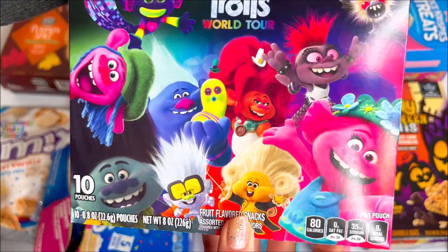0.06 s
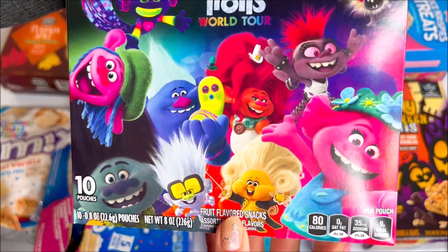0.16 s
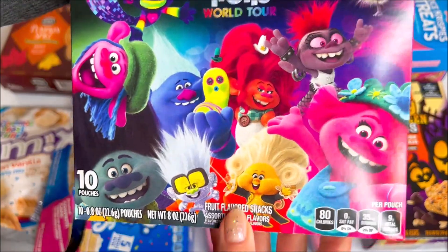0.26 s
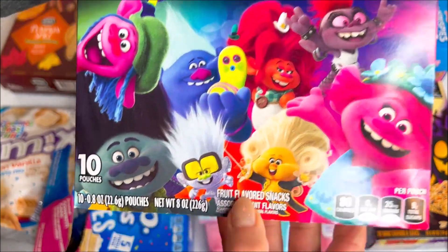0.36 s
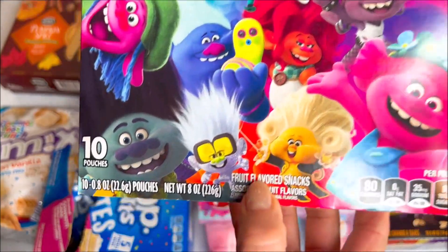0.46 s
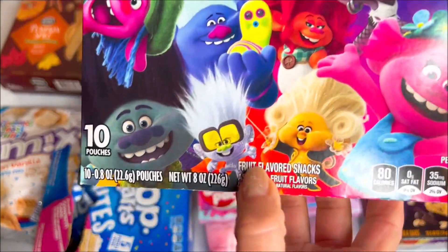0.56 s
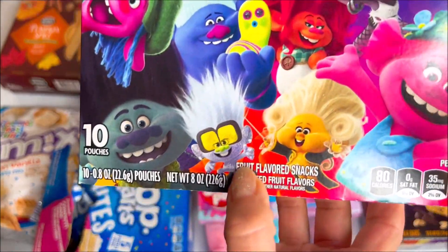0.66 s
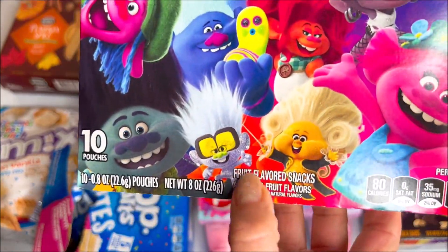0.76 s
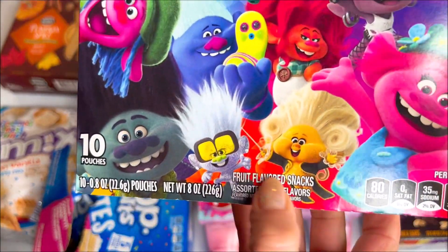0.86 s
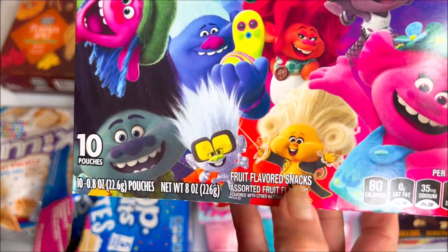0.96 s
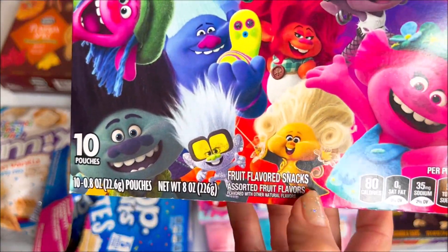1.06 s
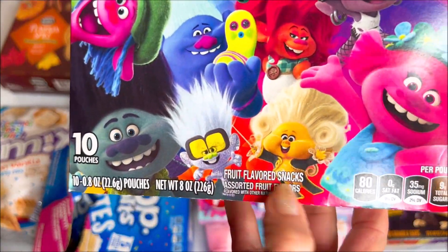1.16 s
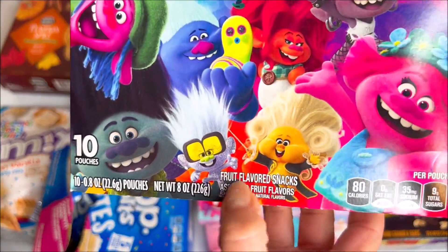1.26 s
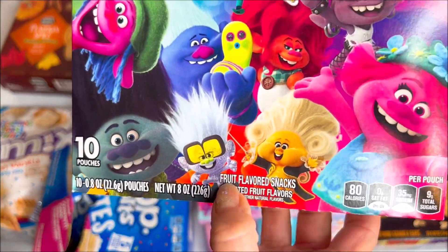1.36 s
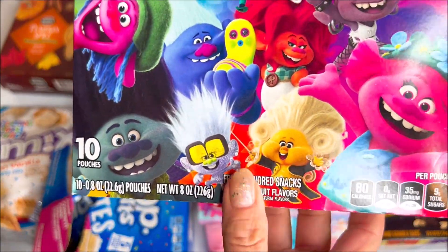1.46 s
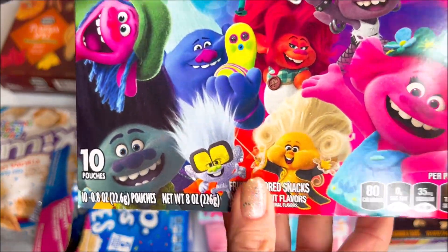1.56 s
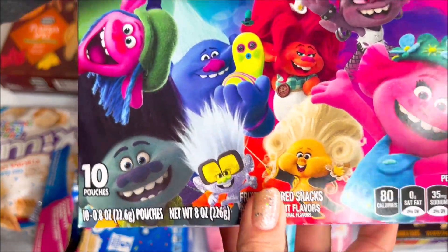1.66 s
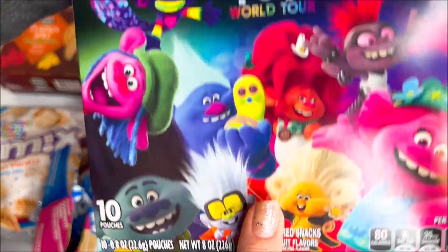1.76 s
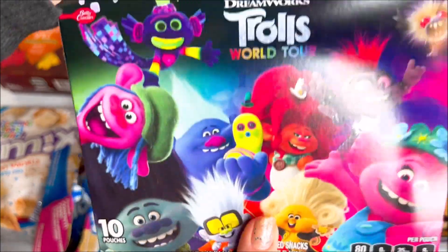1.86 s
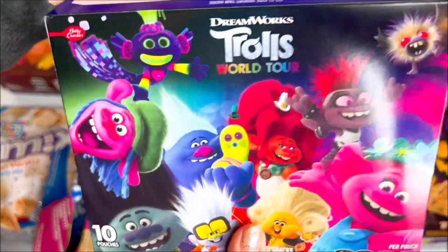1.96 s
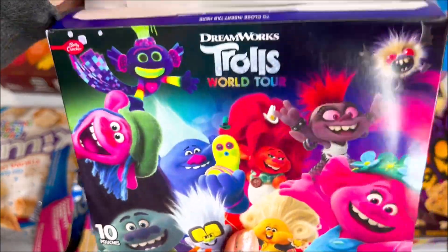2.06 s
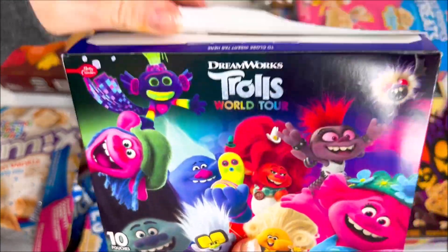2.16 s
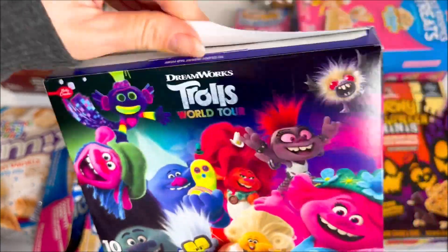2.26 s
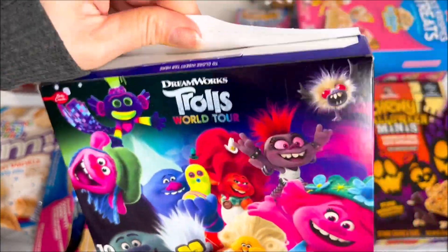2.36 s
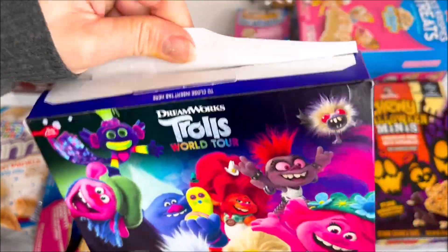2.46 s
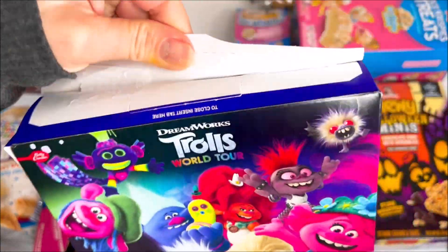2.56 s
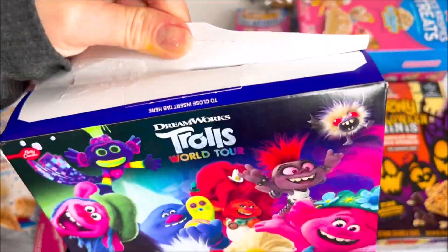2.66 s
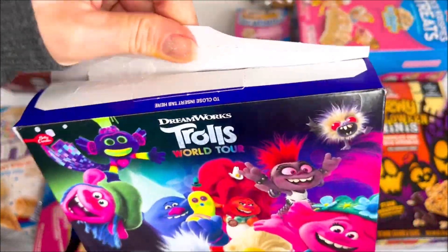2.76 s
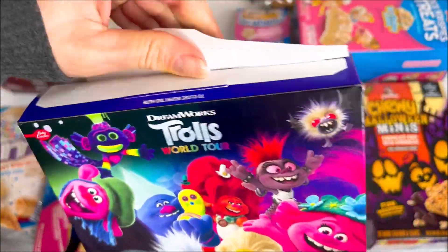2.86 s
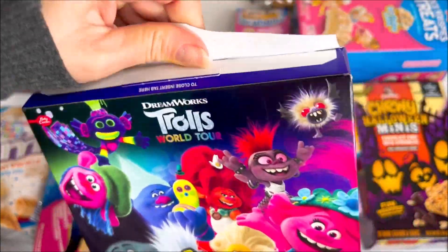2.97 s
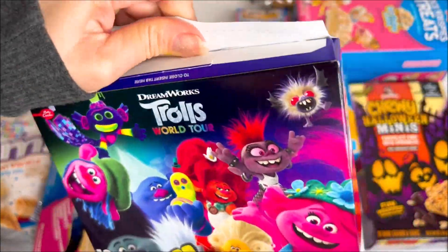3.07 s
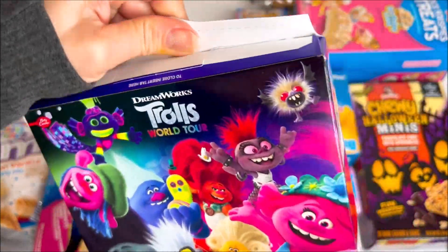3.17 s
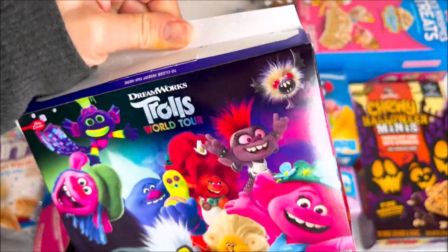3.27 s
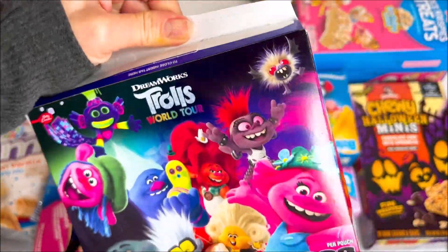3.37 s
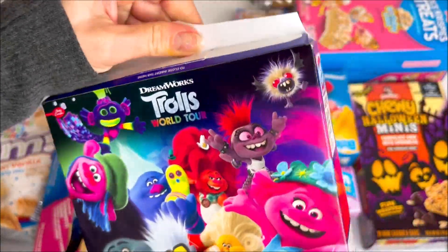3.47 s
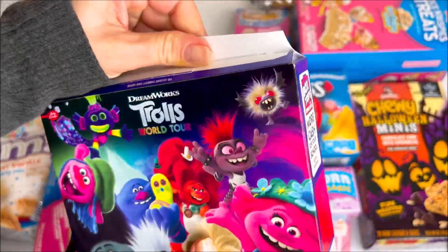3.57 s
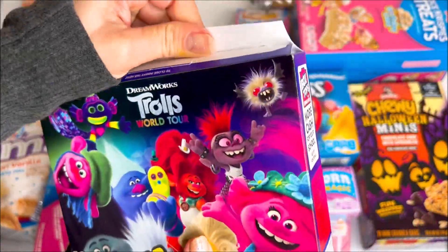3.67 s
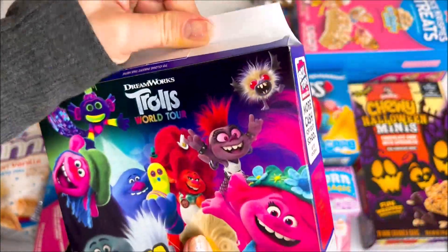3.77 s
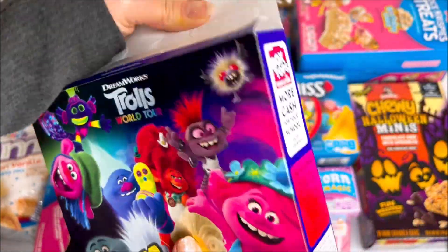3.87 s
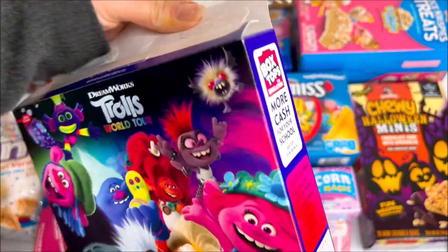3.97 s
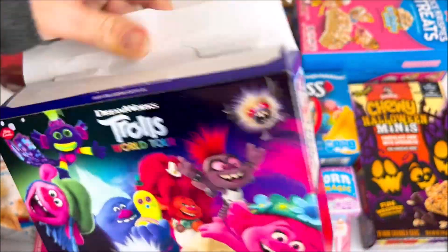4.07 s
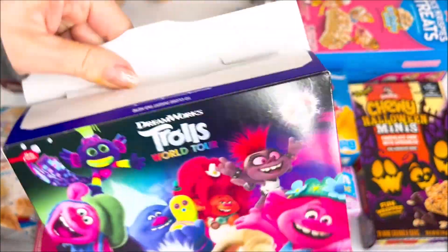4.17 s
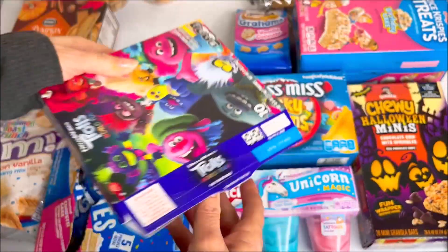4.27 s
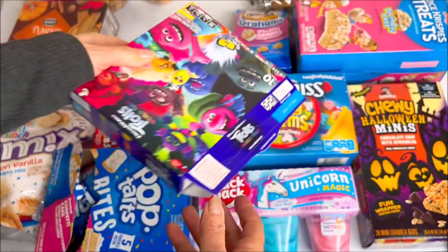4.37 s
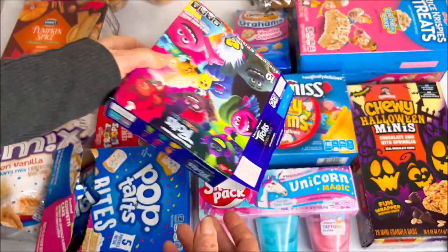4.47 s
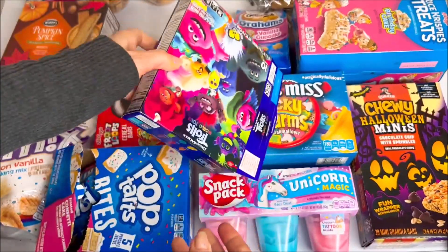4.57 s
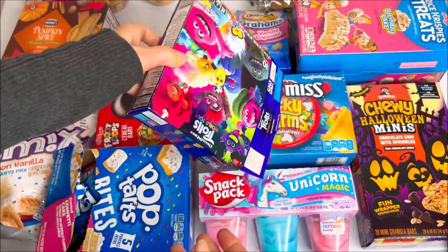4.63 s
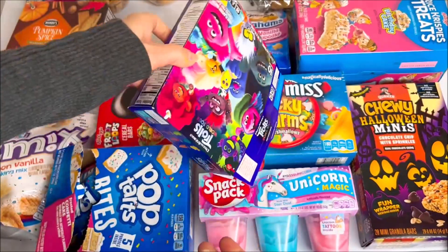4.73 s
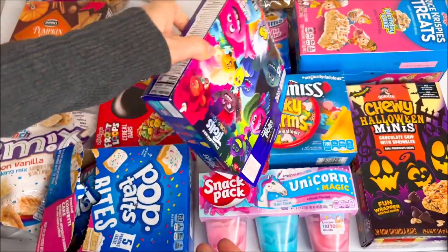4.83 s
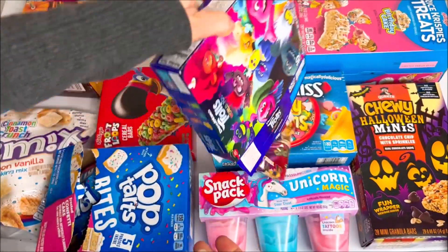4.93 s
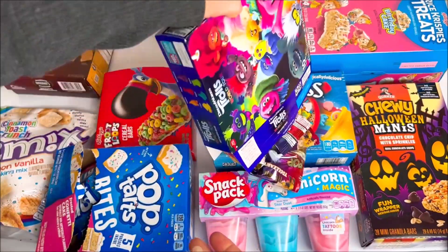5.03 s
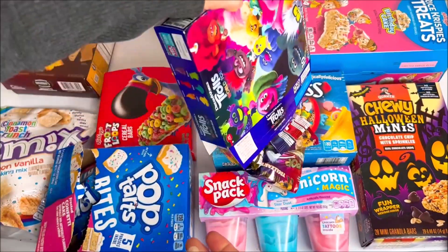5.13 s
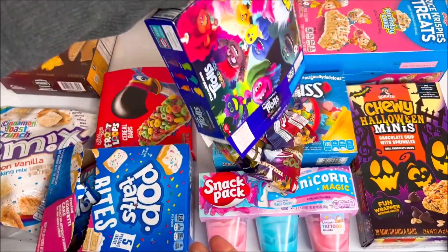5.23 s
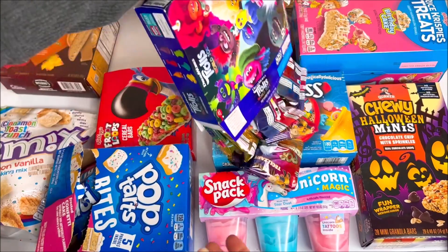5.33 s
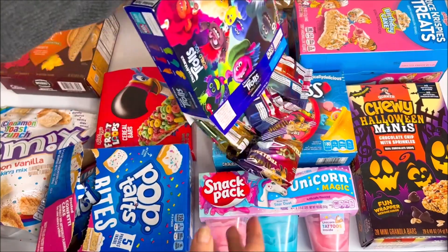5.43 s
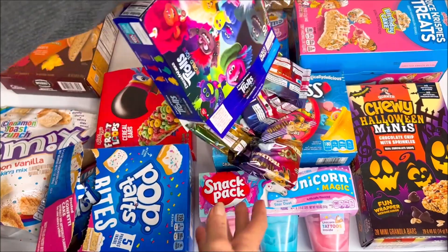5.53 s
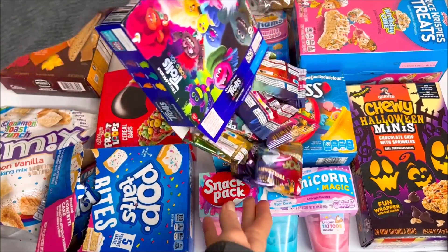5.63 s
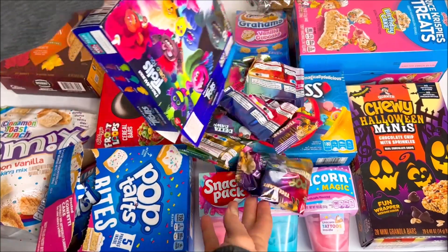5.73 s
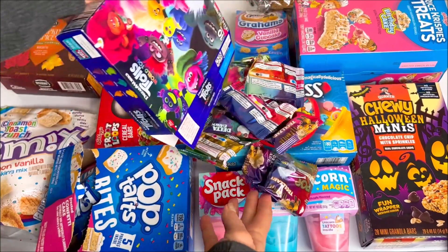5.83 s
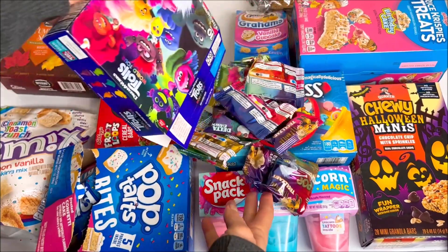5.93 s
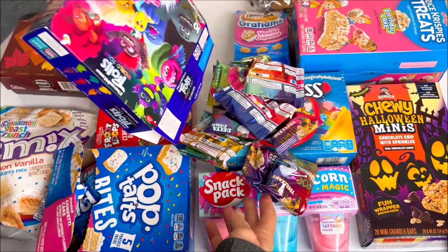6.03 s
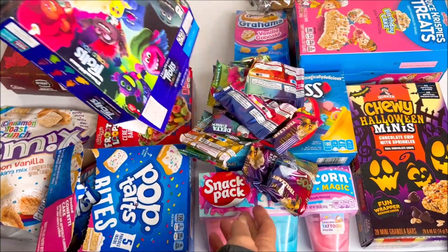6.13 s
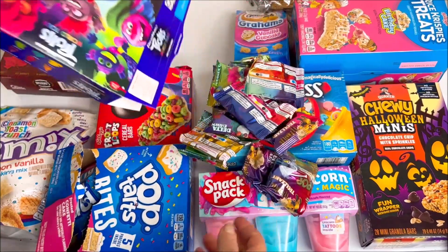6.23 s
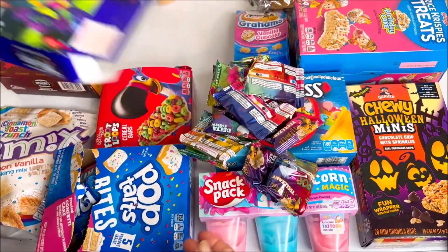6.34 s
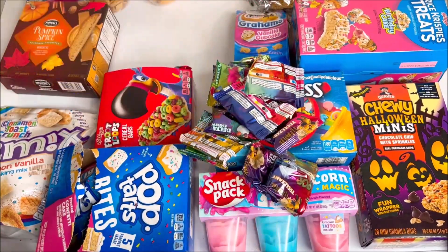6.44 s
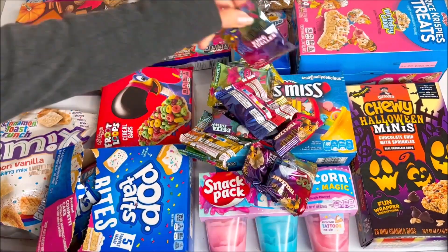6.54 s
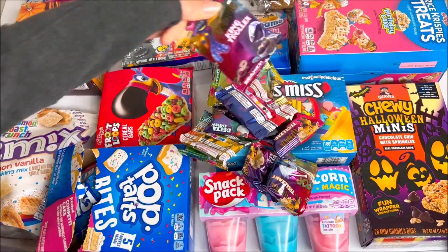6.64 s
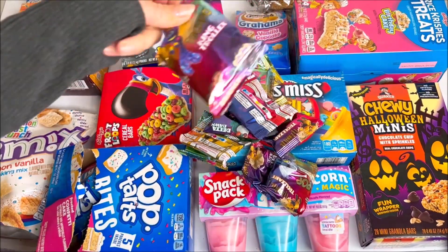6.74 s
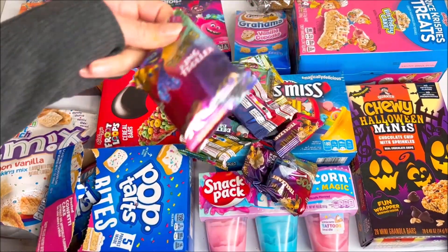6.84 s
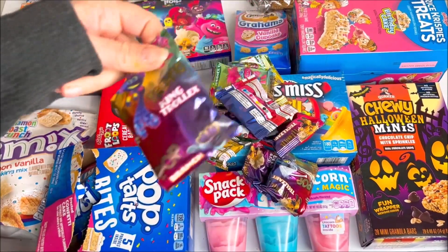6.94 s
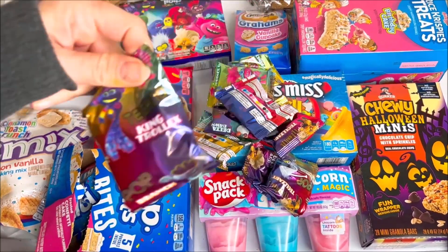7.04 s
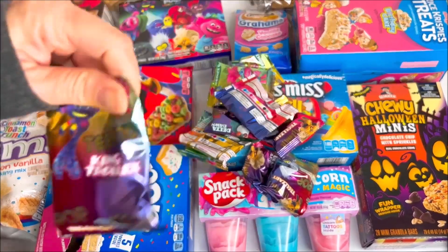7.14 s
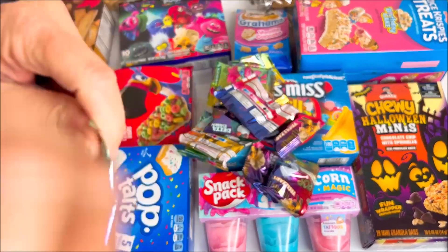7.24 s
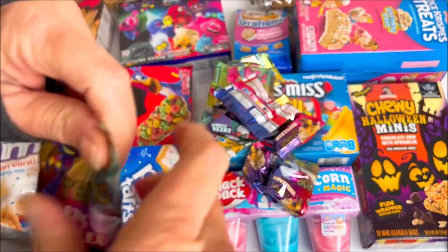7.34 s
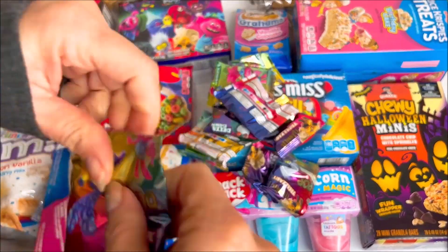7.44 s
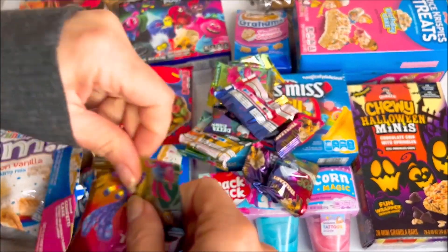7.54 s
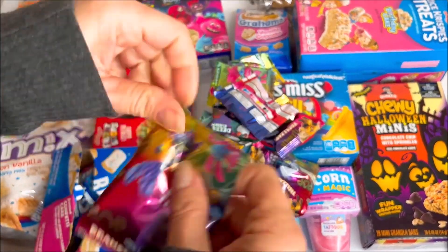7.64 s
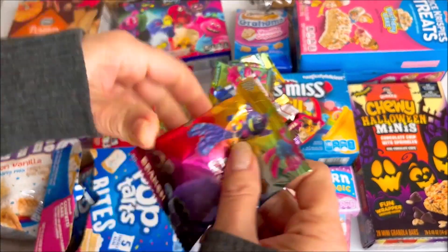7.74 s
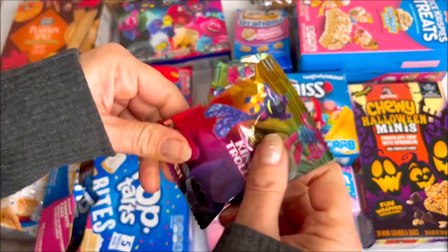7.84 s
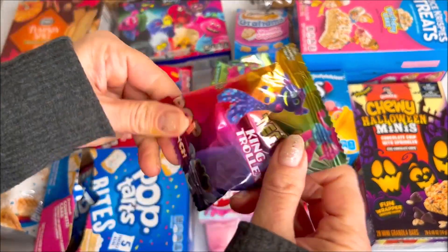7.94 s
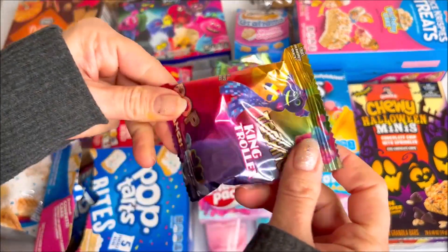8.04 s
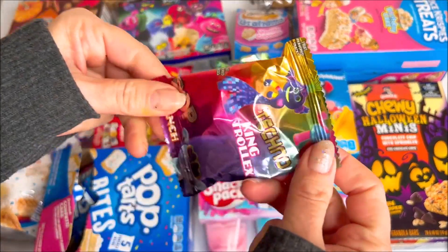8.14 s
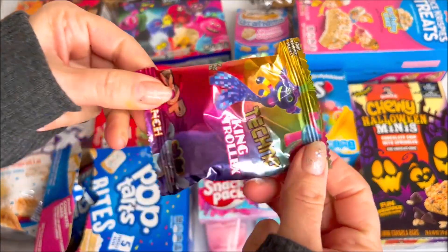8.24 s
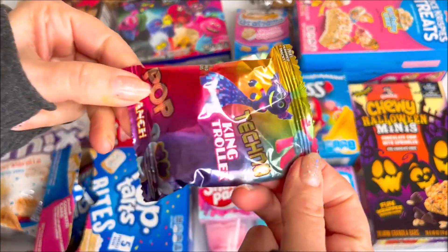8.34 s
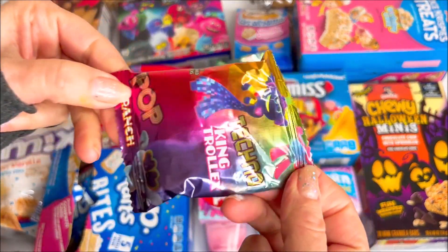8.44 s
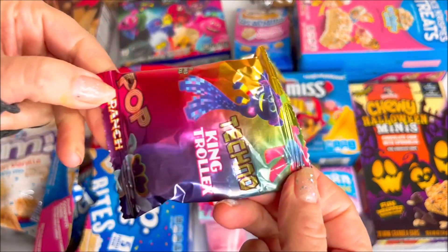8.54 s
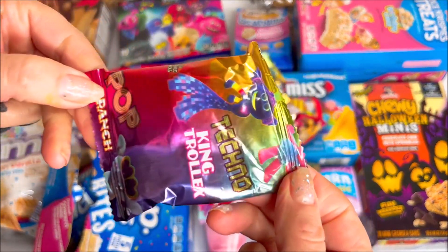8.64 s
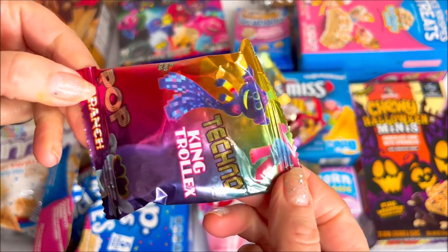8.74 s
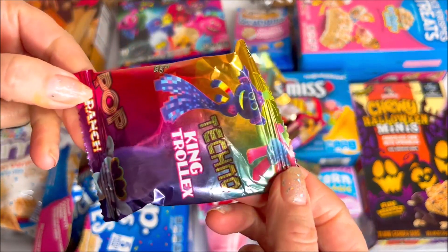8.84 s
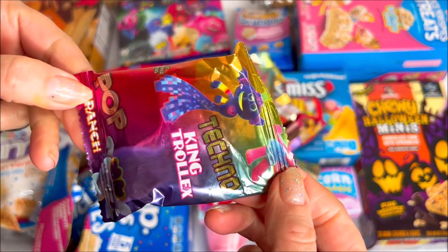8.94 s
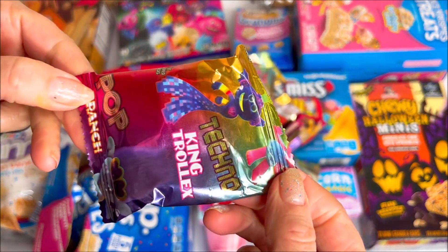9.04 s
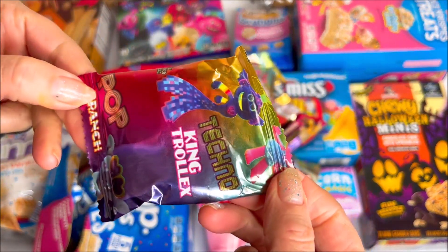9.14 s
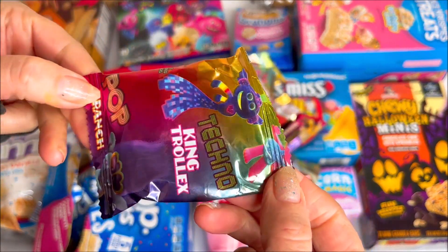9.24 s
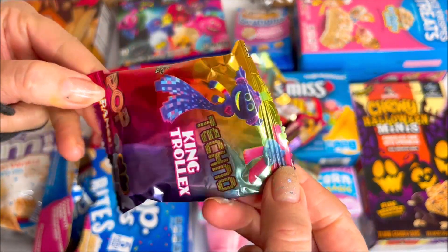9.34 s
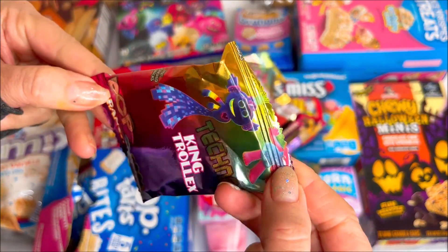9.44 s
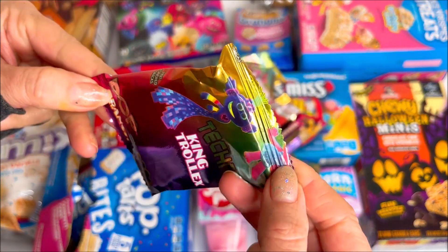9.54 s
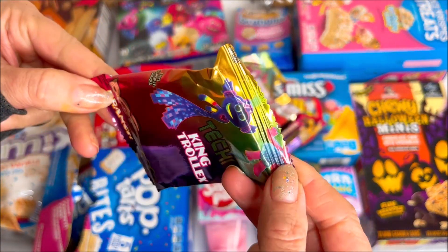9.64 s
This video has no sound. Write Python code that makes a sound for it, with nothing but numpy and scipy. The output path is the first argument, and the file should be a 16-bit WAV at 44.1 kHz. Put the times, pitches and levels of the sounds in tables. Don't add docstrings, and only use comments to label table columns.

```python
import sys
import numpy as np
from scipy import signal
from scipy.fft import rfft, irfft, next_fast_len
from scipy.io import wavfile
from scipy.ndimage import uniform_filter1d

SR = 44100
rng = np.random.default_rng(int(sys.argv[2]) if len(sys.argv) > 2 else 0)


def voltage_ratio(level):
    return 10 ** (np.asarray(level, float) / 20)


def pcm_store(signal):
    levels = np.round(np.clip(np.atleast_2d(signal), -1, 1) * 32767)
    wavfile.write(sys.argv[1], SR, levels.astype(np.int16).T)


N = 427769

# f/Hz, density/dB
HUM_SPECTRUM = [(13, -44.5), (22, -13.5), (49, 10), (95, -4), (302, -8.5), (705, -27.5), (1780, -33.5),
                (15000, -48)]
HUM_DB = -63
LULL_S, LULL_LONG_S, LULL_DB = 6.2, 0.18, -6.5
# f/Hz, t60/s
WALL_T60 = [(200, 0.093), (2000, 0.21), (10000, 0.19)]

# t of firmest contact/s, body level/dB, rise/s, release/s, grit over body/dB
TURNING_STROKES = [(.005, -58.5, .05, 0.039, -5.5), (.117, -55.5, 0.051, 0.13, -16),
                   (.185, -63.5, 0.072, 0.07, -29), (.364, -60.5, 0.069, 0.079, -13),
                   (.585, -62.5, 0.05, 0.07, -12.5), (.811, -60, 0.041, 0.49, -35),
                   (1.04, -59.5, 0.38, 0.03, -5), (1.162, -52.5, 0.015, 0.22, -8),
                   (1.3, -59, 0.19, 0.036, -12), (1.43, -51.5, 0.013, 0.14, -5.5),
                   (1.6, -60.5, 0.13, 0.15, 5)]
OPENING_STROKES = [(1.783, -24.5, 0.11, 0.096, -19), (1.906, -41.5, 0.043, 0.13, -7.5),
                   (1.971, -38.5, 0.05, 0.031, 5.5), (2.107, -41.5, 0.022, 0.079, -20.5),
                   (2.299, -46, 0.28, 0.077, -3.5), (2.589, -47, 0.29, 0.17, 5.5),
                   (2.686, -42.5, 0.087, 0.093, -14), (2.882, -58.5, 0.23, 0.18, 4.5),
                   (3.075, -42.5, 0.26, 0.29, -12.5), (3.401, -49, 0.81, 0.36, -2.5),
                   (3.632, -24, 0.054, 0.16, -23), (3.792, -48.5, 0.28, 0.23, 5),
                   (3.846, -18.5, 0.028, 0.022, -5.5), (3.879, -31.5, 0.035, 0.045, -6.5),
                   (3.939, -32, 0.012, 0.06, -10), (4.149, -42.5, 0.34, 0.12, -2.5),
                   (4.216, -27, 0.015, 0.021, -14.5), (4.321, -43.5, 0.11, 0.18, -8)]
POURING_STROKES = [
    (4.535, -36.5, 0.038, .12, -0.5),
    (4.59, -32.5, 0.04, 0.15, -3.5),
    (4.962, -39.5, 0.28, 0.25, 0),
    (5.21, -49.5, 0.11, 0.15, -0.5),
    (5.28, -42, 0.036, 0.42, 2),
    (5.468, -51, 0.44, 0.067, 4.5),
    (5.715, -39, 0.096, 0.14, 2.5),
    (5.787, -31, 0.015, 0.059, -5),
    (6.0, -67, 0.44, 0.061, 4.5),
    (6.377, -68.5, 0.023, 0.4, -2),
]
DRAG_STROKES = [
    (5.99, -64.5, 0.33, 0.07, -3),
]
DRAG_HZ = 1800
# t of firmest contact/s, crackle level/dB, rise/s, release/s, contents over foil/dB
SQUEEZE_STROKES = [(6.558, -31.5, 0.008, 0.094, -10), (6.8, -56, 0.49, 0.4, 2),
                   (7.076, -35.5, 0.081, 0.12, -2.5), (7.171, -55, 0.12, 0.12, 13.5),
                   (7.41, -34.5, 0.045, 0.14, -2), (7.48, -33, 0.13, 0.029, 3.5),
                   (7.675, -38, 0.18, 0.13, 0), (7.9, -32, 0.16, 0.074, -5), (8.039, -38.5, 0.23, 0.49, -1),
                   (8.47, -46, 0.071, 0.1, 7.5), (8.748, -79, 0.17, 0.31, 12), (9.38, -52, 0.05, 0.21, -4),
                   (9.451, -47.5, 0.13, 0.05, -5), (9.66, -53, 0.14, 0.198, -3.5)]
SWELL_DB = 20
ROUNDED = 1.19

# f/Hz, width/Hz, level/dB
BOX_MODES = [(139.5, 84, -2), (298, 100, 2.5), (450, 88, 1), (612, 90, -0.5), (790, 130, -2.5),
             (1040, 234, -1), (1500, 1480, -11.5)]
# f/Hz, width/Hz, level/dB
LID_MODES = [(1040, 49, 2), (1550, 130, -4.5), (2113, 78, -4), (2845, 41, -2), (3540, 360, -14.5),
             (4500, 430, -13), (7800, 1000, -17.5)]
SLACK_PITCH, BENT_PITCH = 0.91, 1
# f/Hz, density/dB
HISS_SPECTRUM = [(800, -35), (1500, 4), (3000, 0), (5000, 0), (8500, -1), (12000, 1.5), (16000, -3)]
FAR_S, FAR_DB = 4.4, -6.5

# t/s, peak level/dB, panel f/Hz, low push level/dB
BLOWS = [(0.121, -35.5, 249, -16), (0.177, -24, 247, -10), (0.35, -37.5, 234, -26), (1.049, -31.5, 239, -1),
         (1.476, -26.5, 128, -5.5), (1.664, -29, 246, -26), (1.909, -10, 527, -40.5),
         (1.91, -11.5, 157, -9), (1.966, -12.5, 292, -17), (2.104, -27.5, 224, -15),
         (2.212, -36.5, 312, -10), (2.298, -31, 155, -7), (2.478, -27, 226, -8.5), (2.604, -25, 298, -15),
         (2.672, -18.5, 275, -23), (3.359, -29.5, 242, -23), (3.457, -17, 314, -11.5),
         (3.775, -26.5, 322, -20.5), (3.842, -14.5, 244, -16), (3.93, -25, 298, -16),
         (4.209, -12.5, 167, -7), (4.264, -25.5, 150, -27), (4.302, -23.5, 237, -31), (4.59, -13, 397, -41),
         (4.937, -26, 360, -39), (5.004, -19, 450, -24), (5.66, -23.5, 389, -30), (5.783, -22, 385, -22),
         (6.377, -37.5, 386, -30), (8.472, -15, 523, -40)]
# t/s, slip f/Hz, level/dB, lid bend/0-1, box under lid level/dB
CREAK_CURVES = [
    [(1.7, 184, -58, 0, 1.5), (1.72, 195.5, -39, 0.4, -2), (1.755, 204.6, -37, 0, 1),
     (1.785, 214.4, -33.5, 0.7, -2.5), (1.818, 262, -31, 0.9, 0), (1.835, 258, -61.5, .9, 3)],
    [(2.37, 73, -68, .4, 0), (2.39, 76.7, -52, 0.1, 2), (2.52, 61.3, -46, 0.2, 2), (2.54, 61.1, -78, .4, 0)],
    [(2.99, 324.6, -43.5, .3, -17), (3.02, 336, -36, 0.7, -14.5), (3.05, 345, -37.5, 1, -1),
     (3.08, 318, -36.5, 1, -6.5), (3.11, 332.6, -39, 0.4, -6), (3.125, 310, -65.5, .3, -2)],
    [(3.59, 501, -48.5, 0.1, 8.5), (3.63, 528.6, -42, .5, 3), (3.67, 513.5, -42, 0.4, 3.5),
     (3.74, 509, -44.5, 0.2, 6), (3.76, 480, -58, .3, -4)],
]
CREAK_SCATTER = [.055, .07, .17, .075]

# t/s, peak level/dB, ring f/Hz
NAIL_TICKS = [
    (0.289, -52.5, 1800),
    (0.55, -58, 1750),
    (1.5965, -31.5, 2210),
]
# t/s, peak level/dB, ring f/Hz
CARD_BUCKLES = [(0.8005, -39, 1140), (1.8327, -4, 8250), (1.911, -26, 800), (1.9704, -15.5, 940),
                (1.9712, -9.5, 7300), (2.0945, -26.5, 2530), (2.4045, -30, 5970), (2.6803, -10, 1000),
                (2.7391, -31, 1210), (2.8714, -14, 1120), (3.3573, -33, 1040), (3.462, -24, 1220),
                (3.8277, -11, 8000), (3.8555, -6, 1000), (3.9335, -15.5, 1040), (4.1664, -30.5, 1110),
                (4.2093, -23, 1040), (4.2642, -24, 1170), (4.3051, -28.5, 1130)]
# t/s, peak level/dB, ring f/Hz
MORE_CARD_BUCKLES = [(2.0057, -23.5, 6500), (2.0221, -28.5, 6570), (2.1122, -48.5, 786), (2.1243, -32, 775),
                     (2.379, -43, 800), (2.3933, -41, 800), (2.5234, -44.5, 925), (2.5422, -30.5, 8280),
                     (2.5718, -34.5, 807), (2.6076, -22.5, 7870), (2.6351, -41, 1120), (2.661, -30.5, 1036),
                     (2.67, -19.5, 6640), (2.7094, -45, 800), (2.75, -35, 2770), (2.799, -38, 1320),
                     (3.173, -37, 870), (3.389, -34, 6000), (3.4424, -28.5, 1990), (3.5, -36, 1030),
                     (3.5309, -36, 2370), (3.6749, -35, 1120), (3.7252, -30, 870), (3.739, -31.5, 950),
                     (3.7762, -27.5, 945), (3.8091, -22.5, 7700), (3.8683, -20.5, 806), (3.8854, -20.5, 1194),
                     (3.9986, -31.5, 1040), (4.02, -32.5, 1120), (4.0524, -32, 5930), (4.2764, -24, 8070)]
# t/s, peak level/dB, ring f/Hz
POUCH_LANDINGS = [(4.4705, -30.5, 1500), (4.5247, -29.5, 960), (4.588, -14, 2113), (4.745, -30.5, 1490),
                  (4.806, -21, 7600), (4.8945, -21, 8000), (5.236, -28, 8050), (5.271, -18, 1330),
                  (5.339, -21.5, 2120), (5.527, -27.5, 7000), (5.6409, -23.5, 3780), (5.7, -26.5, 925),
                  (5.7291, -15.5, 2490), (5.781, -22.5, 986)]
# t/s, peak level/dB, ring f/Hz
MORE_POUCH_LANDINGS = [(4.536, -23, 1550), (4.5589, -23, 1115), (4.5964, -20.5, 1377), (4.6302, -36, 950),
                       (4.648, -28.5, 1120), (4.678, -36.5, 1340), (4.8437, -24.5, 7620), (4.864, -31, 1300),
                       (4.949, -26.5, 2000), (4.968, -22, 8330), (5.0053, -20.5, 2570), (5.0163, -25.5, 8300),
                       (5.0966, -33.5, 1850), (5.3202, -27, 1320), (5.3834, -26.5, 1700), (5.409, -27, 6480),
                       (5.4273, -26, 2570), (5.458, -24, 1700), (5.7129, -19.5, 2230), (5.7606, -40, 5930)]
# t/s, peak level/dB, ring f/Hz
LIFT_BUCKLES = [(6.37, -50, 3020), (6.5523, -18, 2140), (6.6305, -37, 1040), (6.691, -42, 8230),
                (6.7087, -34, 8410), (6.7284, -41, 1150), (6.787, -37.5, 1120), (6.797, -37.5, 1670),
                (6.8644, -37.5, 1550), (6.9419, -26.5, 4930), (6.9585, -29, 7800), (7.005, -21.5, 7360),
                (7.0355, -21.5, 5630), (7.05, -13, 6600), (7.0627, -24, 7550), (7.0867, -21.5, 8700),
                (7.0901, -10.5, 4120), (7.1582, -15.5, 6630), (7.1681, -14.5, 8780), (7.1778, -7, 6370),
                (7.2249, -24.5, 6300)]
# t/s, peak level/dB, ring f/Hz, contents level/dB
TURN_BUCKLES = [(7.346, -26, 3910, 6), (7.3581, -18.5, 2390, -22), (7.3691, -14.5, 4320, -24.5),
                (7.377, -29.5, 3590, -11), (7.3812, -16.5, 8350, 6), (7.3856, -10, 8230, -10.5),
                (7.4, -21.5, 7480, -12.5), (7.4094, -27.5, 5490, -11.5), (7.413, -13.5, 6500, -5),
                (7.4205, -14, 2390, -10.5), (7.4242, -18.5, 4270, 1.5), (7.4337, -18, 3920, -6),
                (7.4393, -23, 3040, -6.5), (7.4478, -10.5, 5910, -10.5), (7.454, -16, 3310, -12.5),
                (7.4634, -15.5, 2820, -18), (7.4713, -17, 2800, -6.5), (7.4774, -22, 1700, -22.5),
                (7.4827, -8.5, 7080, -14), (7.4927, -18, 2570, -17.5), (7.4976, -12.5, 1590, -9.5),
                (7.5088, -9, 1984, -12.5), (7.5178, -38.5, 3910, -13), (7.5227, -32, 3040, -13),
                (7.5282, -36.5, 2010, -5.5), (7.532, -30, 6540, -5.5), (7.536, -19, 4250, -7),
                (7.541, -10.5, 4050, -7), (7.5475, -30.5, 1560, 3), (7.5845, -10, 4850, -25),
                (7.6142, -23.5, 5450, -12.5), (7.6247, -17.5, 4870, -8), (7.6336, -37.5, 4250, -20),
                (7.651, -32.5, 3910, -13), (7.6586, -24.5, 3040, -18), (7.6653, -8, 4250, -37),
                (7.6702, -26.5, 1840, 3.5), (7.6833, -34.5, 1560, -1.5), (7.6903, -25, 1560, -14),
                (7.7123, -21, 7220, -16.5), (7.7418, -15.5, 2600, -13), (7.7617, -30, 1560, 10),
                (7.7733, -33.5, 4250, -0.5),
                (7.812, -34, 2570, -4), (7.823, -18.5, 4800, 6.5), (7.85, -27, 5020, -13),
                (7.8635, -34.5, 4250, -3), (7.8717, -26, 4250, -2), (7.8911, -17, 4320, 0),
                (7.8947, -13.5, 1500, -21), (7.9114, -18, 5450, 2.5), (7.9661, -20, 2820, 5),
                (7.9775, -15.5, 7620, -4.5), (7.991, -23.5, 3940, -12), (8.0101, -32, 2370, 12),
                (8.0135, -10.5, 8400, -21), (8.0302, -15.5, 1470, -5), (8.0332, -28, 3060, -10),
                (8.0532, -21.5, 2000, -4), (8.0608, -12, 8600, -8), (8.0686, -27, 8330, -10),
                (8.0709, -29.5, 8280, 0.5), (8.076, -25, 1700, -2), (8.0902, -34, 3040, -11),
                (8.1023, -18, 2330, 8.5), (8.1096, -29, 1700, 20.5), (8.1407, -13, 5700, -18),
                (8.15, -32, 2000, -22), (8.1627, -21, 1990, -6.5), (8.1861, -26.5, 1710, -15),
                (8.202, -33, 2570, 5.5), (8.2072, -29.5, 5450, -5), (8.2549, -23, 1840, 8),
                (8.2644, -33, 1560, 15), (8.2906, -19.5, 5450, -5.5), (8.31, -11.5, 8280, 2.5),
                (8.338, -22.5, 7010, -20), (8.3565, -22.5, 1530, -23), (8.3977, -24, 6500, -23),
                (8.415, -29.5, 1560, 4), (8.445, -30.5, 1560, 10), (8.454, -13, 4700, 3),
                (8.4692, -14.5, 3540, 13.5), (8.472, -7.5, 4400, 5.5), (8.4826, -33, 1970, -0.5),
                (8.4925, -35.5, 2020, -13)]
# t/s, peak level/dB, ring f/Hz
HOLD_BUCKLES = [(8.593, -50, 8000), (8.6162, -41.5, 7980), (8.651, -47, 3000), (8.684, -45.5, 1475),
                (8.717, -45, 800), (8.744, -23.5, 2580), (8.877, -54, 1240), (8.991, -26.5, 3030),
                (9.1921, -63, 1750), (9.3467, -32, 2610), (9.362, -19.5, 8050), (9.42, -22.5, 3650),
                (9.4514, -25.5, 2850), (9.4709, -23, 4220), (9.541, -27.5, 4030), (9.551, -39, 4990),
                (9.5653, -16.5, 7800), (9.612, -26.5, 4030), (9.619, -20.5, 8260), (9.628, -14.5, 5060),
                (9.648, -21.5, 8250)]
# f/Hz, density/dB
FOIL_SPECTRUM = [(700, -14), (1500, -8.5), (3000, -0.5), (6000, 0.5), (8500, 5), (12000, 5.5), (15500, 2),
                 (16600, -22)]

# f/Hz, correlation/1
PORT_LIKENESS = [(40, .85), (150, .92), (500, .82), (1400, .72), (3000, .66), (6000, .68), (9500, .93)]
# f/Hz, phase/rad
PORT_LEAD = [(0, 0), (1500, 0), (3200, .8), (6600, .3), (7750, .7), (8475, 0)]
# f/Hz, level/dB
PORT_BALANCE = [(60, 3), (550, 6.5), (2400, 3.5), (5500, 4), (8100, 1.6), (10000, 0)]
LAG_FROM_HZ, LAG_TURN_HZ = 8475, 3550
ASIDE_S, ASIDE_LONG_S, ASIDE_DB = 5.2, 0.75, 2.6
STEADY_TOP_HZ = 15900


def unit(x):
    return x / np.sqrt(np.mean(x ** 2) + 1e-20)


def along(points, hz):
    f, v = np.transpose(points)
    return np.interp(np.log(hz + 1), np.log(f + 1), v)


def curves(rows):
    s, *cols = np.transpose(rows)
    t = np.arange(N) / SR
    return [np.interp(t, s, c, left=-140, right=-140) for c in cols]


def filtered(x, response):
    m = next_fast_len(N + SR // 2)
    f = np.fft.rfftfreq(m, 1 / SR)
    return irfft(rfft(x, m) * response(f), m)[..., :N]


def resonance(f, hz, width_hz):
    return 1j * f * width_hz / (hz * hz - f * f + 1j * f * width_hz)


def modes(table, f):
    return sum((-1) ** k * voltage_ratio(db) * resonance(f, hz, width_hz) for k, (hz, width_hz, db) in enumerate(table))


def pair():
    def mid_side(hz):
        turn_rad = np.arccos(along(PORT_LIKENESS, hz)) / 2
        return np.array([np.cos(turn_rad), np.sin(turn_rad)])

    mid, side = filtered(rng.standard_normal((2, N)), mid_side)
    return np.array([mid + side, mid - side])


def grains(per_s, spread_db, life_s, smooth):
    chance, size = rng.random((2, N))
    kicks = (chance < per_s / SR) * voltage_ratio(-spread_db * np.log(np.maximum(size, 2e-2)))
    gate = signal.lfilter([1], [1, -np.exp(-1 / (life_s * SR))], kicks)
    return pair() * (unit(gate) + smooth)


def patchy(x, depth_db):
    z = signal.stft(x, nperseg=512)[2]
    field = uniform_filter1d(rng.standard_normal(z.shape[1:]), size=5, axis=0)
    field = uniform_filter1d(field, size=12, axis=1)
    return signal.istft(z * voltage_ratio(depth_db * unit(field)), nperseg=512)[1][:, :N]


def pressure(strokes):
    s, db, rise_s, fall_s, second_db = np.transpose(strokes)[:, :, None]
    t = np.arange(0, N + 64, 64) / SR
    away = np.maximum((s - t) / np.abs(rise_s), (t - s) / np.abs(fall_s))
    power = voltage_ratio(2 * (db - SWELL_DB * away ** ROUNDED))
    levels = [10 * np.log10(p.sum(0) + 1e-14) for p in (power, power * voltage_ratio(2 * second_db))]
    return [np.interp(np.arange(N) / SR, t, v) for v in levels]


def air():
    swell = unit(uniform_filter1d(rng.standard_normal(N), size=4000))
    lull = np.exp(-((np.arange(N) / SR - LULL_S) / LULL_LONG_S) ** 2)
    hum = unit(filtered(pair(), lambda f: voltage_ratio(along(HUM_SPECTRUM, f))))
    return voltage_ratio(HUM_DB + 1.4 * swell + LULL_DB * lull) * hum


def room(x):
    hz, t, z = signal.stft(pair()[:, :SR // 2], SR, nperseg=256)
    decay = voltage_ratio(-60 * t / along(WALL_T60, hz)[:, None])
    tail = signal.istft(z * decay, SR, nperseg=256)[1]
    late = np.pad(x, ((0, 0), (200, 0)))
    return signal.fftconvolve(late, tail / np.linalg.norm(tail[0]), axes=1)[:, :N]


def rub():
    body_db, hiss_db = pressure(TURNING_STROKES + OPENING_STROKES + POURING_STROKES)
    body_db = body_db - 19 * sum(curves(rows)[0] > 150 for rows in CREAK_CURVES)
    body = grains(per_s=240, spread_db=3, life_s=0.0046, smooth=0.87)
    body = filtered(body, lambda f: modes(BOX_MODES, f))
    hiss = grains(per_s=500, spread_db=5.5, life_s=0.002, smooth=0.65)
    hiss = patchy(filtered(hiss, lambda f: voltage_ratio(along(HISS_SPECTRUM, f))), depth_db=1.2)
    top = filtered(hiss, lambda f: 1 / (1 + (6500 / (f + 1)) ** 4)) / np.std(hiss)
    far_db = FAR_DB * (np.arange(N) > FAR_S * SR)
    bright_db = 0.44 * np.clip(hiss_db - body_db - 11.0, -15, 7) + 0.39 * (hiss_db + 60) + far_db
    hiss = unit(hiss) + (voltage_ratio(bright_db) - 1) * top
    return voltage_ratio(body_db + 3.0) * unit(patchy(body, depth_db=4.0)) + voltage_ratio(hiss_db + 4.5) * hiss


def thumps():
    out, t = np.zeros(N + SR), np.arange(SR // 8) / SR
    for s, db, hz, push_db in BLOWS:
        sag_t = t + 0.0012 * (1 - np.exp(-t / 0.0024))
        panel = voltage_ratio(6.5 - 60 * t * hz / 8) * np.sin(2 * np.pi * hz * sag_t)
        push = voltage_ratio(push_db + 8.0 - 60 * t / 0.058) * np.sin(2 * np.pi * 85 * t)
        rise_s = 0.0045 * voltage_ratio(-(db + 28) / 3)
        onset = 1 - np.exp(-(t / rise_s) ** 2)
        out[round(s * SR):][:len(t)] += voltage_ratio(db) * onset * (panel + push)
    return out[:N]


def snaps(table, ring_share, sharp, rise_s, life_s, trail_db, reach, least_hz):
    s, db, hz, low_db = np.transpose(table)[:, :, None]
    k, f = np.arange(-128, 1536), np.fft.rfftfreq(2048, 1 / SR)
    t = k / SR
    fall = (np.exp(-t / life_s) + voltage_ratio(trail_db) * np.exp(-t / 0.008)) / (1 + voltage_ratio(trail_db))
    shape = np.where(t < 0, np.exp(t / rise_s), fall)
    at = np.round(s * SR).astype(int) + k
    burst = np.pad(pair(), ((0, 0), (0, len(k))))[:, at] * shape
    corner_hz = reach * np.maximum(hz, least_hz) * voltage_ratio(0.16 * (db + 17))
    dull = 1 / (1 + (f / corner_hz) ** 2)
    ring = ring_share * resonance(f, hz, hz / sharp)
    low = voltage_ratio(low_db) * resonance(f, 630, 950)
    colour = dull * (voltage_ratio(along(FOIL_SPECTRUM, f)) + ring + low)
    burst = irfft(rfft(burst, 2048) * colour)[..., :len(k)]
    burst *= voltage_ratio(db + 0.5) / np.abs(burst.mean(0)).max(1, keepdims=True)
    return np.array([np.bincount(at.ravel(), b.ravel(), N + len(k))[:N] for b in burst])


def creaks():
    out = np.zeros((3, N))
    wander = unit(uniform_filter1d(rng.standard_normal(N), size=200))
    size_db = 15.0 + 2 * rng.standard_normal(N)
    for rows, scatter in zip(CREAK_CURVES, CREAK_SCATTER):
        rate_hz, db, bend, box_db = curves(rows)
        slips = np.cumsum(np.maximum(rate_hz, 0) * (1 + scatter * wander) / SR)
        at = np.flatnonzero(np.diff(np.floor(slips)) > 0)
        bend = np.clip(bend[at], 0, 1)
        pulse = voltage_ratio(db[at] + size_db[at]) * np.sqrt(SR / np.maximum(rate_hz[at], 1))
        out[:, at] = pulse * [voltage_ratio(box_db[at]), 1 - bend, bend]

    def bodies(f):
        lids = [modes(LID_MODES, f / SLACK_PITCH), modes(LID_MODES, f / BENT_PITCH)]
        return np.array([modes(BOX_MODES[:5], f), *lids])

    return filtered(out, bodies).sum(0)


def drag():
    band = filtered(rng.standard_normal(N), lambda f: resonance(f, DRAG_HZ, 300) ** 2)
    return voltage_ratio(pressure(DRAG_STROKES)[0]) * unit(band)


def crinkle():
    crackle_db, body_db = pressure(SQUEEZE_STROKES)
    crackle = grains(per_s=400, spread_db=4.5, life_s=0.0015, smooth=0.7)
    crackle = unit(filtered(crackle, lambda f: voltage_ratio(along(FOIL_SPECTRUM, f))))
    body = grains(per_s=200, spread_db=5.5, life_s=0.0037, smooth=0.4)
    body = unit(filtered(body, lambda f: resonance(f, 800, 2900) ** 2))
    return voltage_ratio(crackle_db - 9.5) * crackle + voltage_ratio(body_db - 9.0) * body


def scene():
    def with_low(rows, low_db):
        return [(*row, low_db) for row in rows]

    loose = LIFT_BUCKLES + HOLD_BUCKLES
    knocks = CARD_BUCKLES + POUCH_LANDINGS + NAIL_TICKS + MORE_CARD_BUCKLES + MORE_POUCH_LANDINGS
    knocks = with_low(knocks + [row for row in loose if row[2] <= 1800], low_db=0)
    card = snaps(knocks, ring_share=2.4, sharp=7, rise_s=0.0004, life_s=0.0012, trail_db=-8,
                 reach=2.6, least_hz=0)
    clear = TURN_BUCKLES + with_low([row for row in loose if row[2] > 1800], low_db=-9)
    foil = snaps(clear, ring_share=1.1, sharp=3.3, rise_s=0.00035, life_s=0.0006, trail_db=-17,
                 reach=2.2, least_hz=2600)
    steady = card + thumps() + creaks() + rub() + crinkle() + drag()
    steady = steady + voltage_ratio(-15.5) * room(steady + foil) + air()
    aside_db = ASIDE_DB / 2 * np.exp(-((np.arange(N) / SR - ASIDE_S) / ASIDE_LONG_S) ** 4)
    return (foil + filtered(steady, lambda f: f < STEADY_TOP_HZ)) * voltage_ratio([-aside_db, aside_db])


def top_cut(x):
    return signal.sosfilt(signal.butter(12, 17130, fs=SR, output="sos"), x)


def record(dry):
    def ports(f):
        lag_rad = 2 * np.pi * np.maximum(f - LAG_FROM_HZ, 0) / LAG_TURN_HZ
        half = voltage_ratio(along(PORT_BALANCE, f) / 2) * np.exp(0.5j * (along(PORT_LEAD, f) - lag_rad))
        return np.array([half, 1 / half]) / (1 + (38 / (f + 1)) ** 4)

    return top_cut(filtered(dry, ports))


dry = scene()
out = record(dry)
pcm_store(out)
```